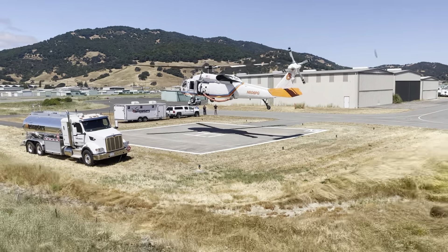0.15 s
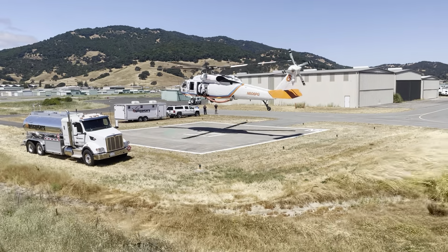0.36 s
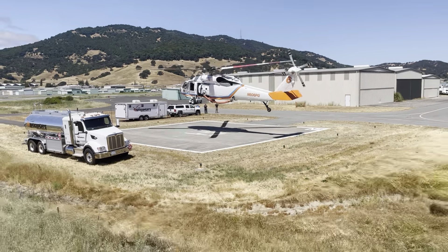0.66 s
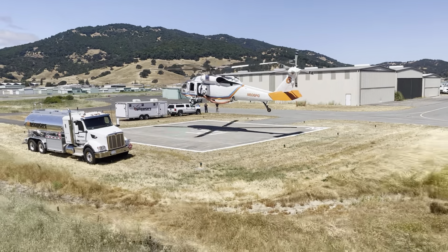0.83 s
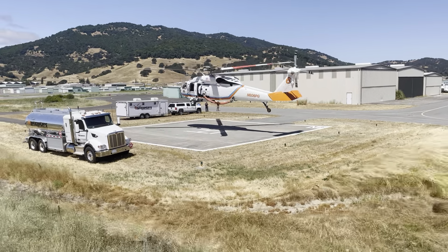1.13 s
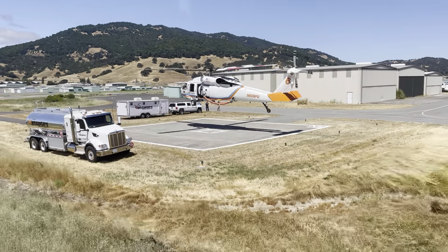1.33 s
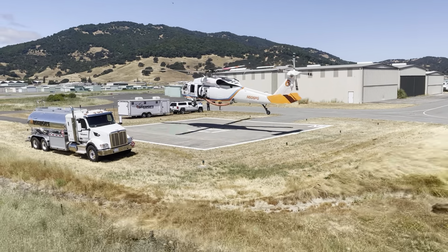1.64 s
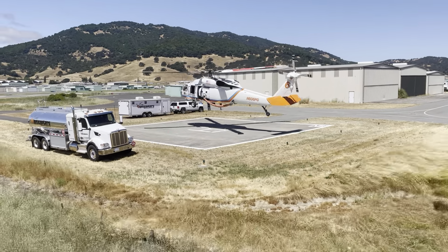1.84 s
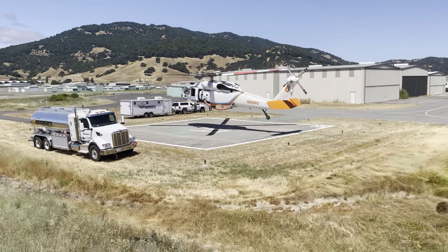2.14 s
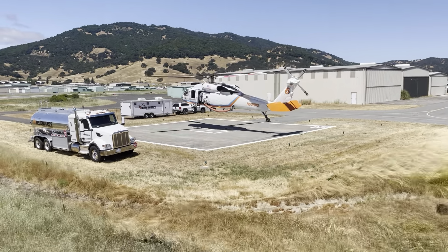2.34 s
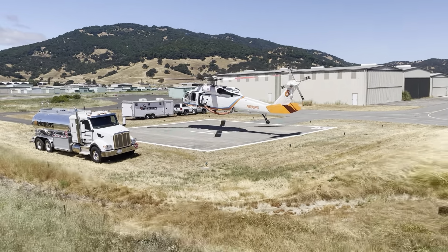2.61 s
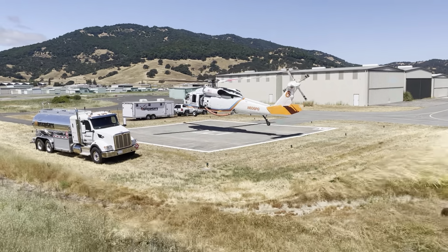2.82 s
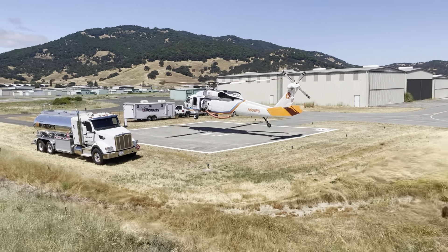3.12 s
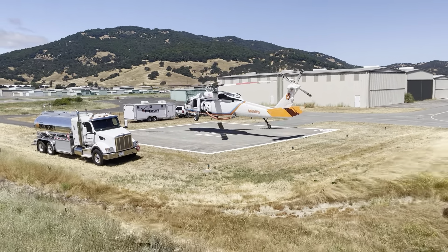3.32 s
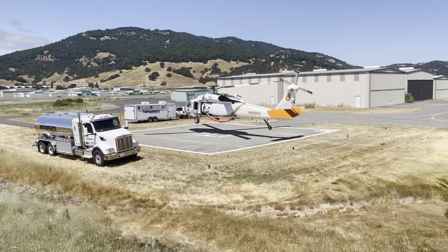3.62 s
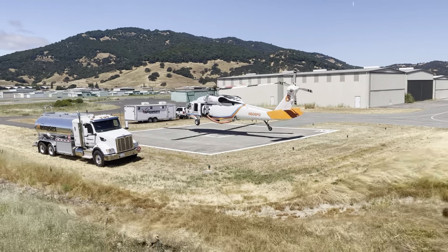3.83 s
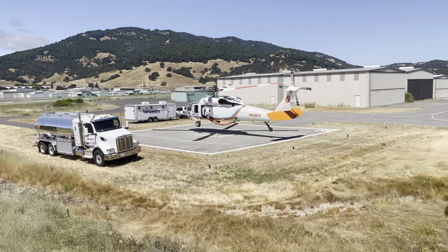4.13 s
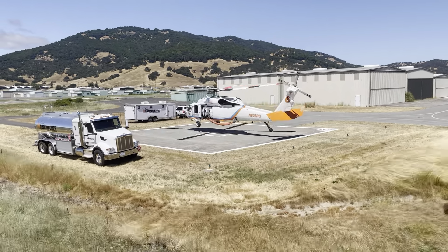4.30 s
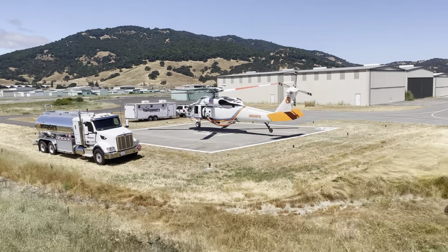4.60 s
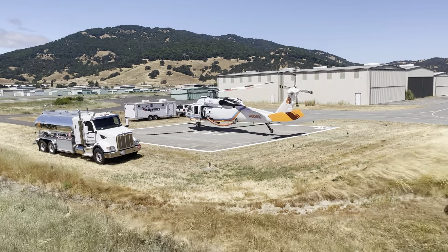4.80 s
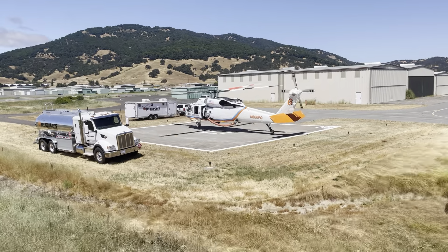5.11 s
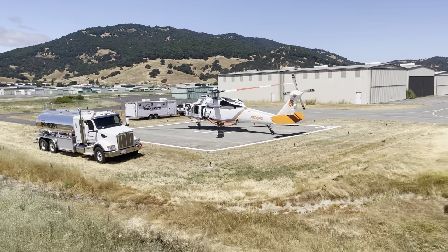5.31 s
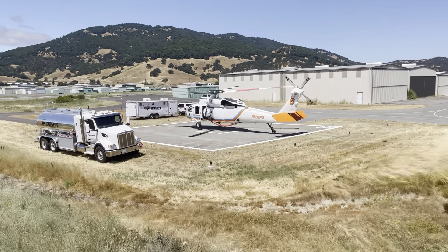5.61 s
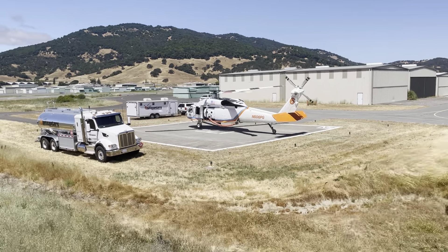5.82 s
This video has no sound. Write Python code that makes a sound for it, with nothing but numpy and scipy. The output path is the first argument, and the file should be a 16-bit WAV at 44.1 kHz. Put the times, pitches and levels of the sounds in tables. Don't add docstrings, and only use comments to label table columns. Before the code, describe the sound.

Outdoors, a big twin-turbine helicopter lowers onto a pad across a grassy field. Its roar pulses about seventeen times a second over exhaust hiss and gear whine, with downwash thumping and ripping at the stereo microphone. Before three seconds the gusts ease, main blades crack dully and the tail rotor buzzes in bursts. Gusts return near five seconds and the beating continues to the end.

```python
import sys
import numpy as np
from scipy import signal
from scipy.fft import rfft, irfft, next_fast_len
from scipy.io import wavfile
from scipy.ndimage import uniform_filter1d, map_coordinates

SR = 44100
rng = np.random.default_rng(int(sys.argv[2]) if len(sys.argv) > 2 else 0)


def put_to_file(sound):
    columns = np.atleast_2d(sound).T
    safe = np.clip(columns, -1, 1)
    whole_steps = np.round(safe * 32767)
    wavfile.write(sys.argv[1], SR, whole_steps.astype(np.int16))


def ratio_of_db(decibels):
    return 10 ** (np.asarray(decibels, float) / 20)


N = 262387


def unit(x):
    return x / np.sqrt(np.mean(x ** 2) + 1e-20)


def along(points, hz):
    f, v = np.transpose(points)
    return np.interp(np.log(hz + 1), np.log(f + 1), v)


def curves(rows):
    s, *cols = np.transpose(rows)
    return [np.interp(np.arange(N) / SR, s, c) for c in cols]


def wobble(rate_hz):
    knots = rng.standard_normal(int(N * rate_hz / SR) + 4)
    return map_coordinates(knots, [np.arange(N) * rate_hz / SR])


def filtered(x, response):
    m = next_fast_len(N + SR // 2)
    return irfft(rfft(x, m) * response(np.fft.rfftfreq(m, 1 / SR)), m)[..., :N]


def rush(spectrum, alike, patchy_db):
    z = signal.stft(rng.standard_normal((2, N)), nperseg=512)[2]
    field = uniform_filter1d(rng.standard_normal(z.shape[1:]), size=8, axis=0)
    field = uniform_filter1d(field, size=5, axis=1)
    pair = signal.istft(z * ratio_of_db(patchy_db * unit(field)), nperseg=512)[1][:, :N]

    def mid_side(hz):
        gain = ratio_of_db(np.where(hz > spectrum[-1][0], -120, along(spectrum, hz)))
        turn = np.arccos(np.clip(along(alike, hz), -1, 1)) / 2
        return gain * [np.cos(turn), np.sin(turn)]

    mid, side = filtered(pair, mid_side)
    return unit(np.array([mid + side, mid - side]))


def evened(x, span_s):
    span = int(span_s * SR)
    power = uniform_filter1d(uniform_filter1d(np.mean(x ** 2, axis=0), span), span)
    return unit(x / np.sqrt(np.abs(power) + 0.15))


def swell(passes, lag, skew):
    u = 2 * np.pi * (passes - lag)
    return np.cos(u) + skew * np.cos(2 * u)


def per_pass(passes, values):
    return uniform_filter1d(values[np.floor(passes + .5).astype(int) % len(values)], size=200)


def swells(s, length_s, rise):
    late = np.arange(0, N + 64, 64) / SR - np.asarray(s)[:, None]
    width = np.asarray(length_s)[:, None] * np.where(late < 0, rise, 1) / 2
    return np.exp(-.5 * (late / width) ** 2)


def summed(bells, heights):
    return np.interp(np.arange(N), 64 * np.arange(bells.shape[1]), heights @ bells)


# time_s, level_db, blade_loading_db (depth of each slap), low_boom_db
ROAR = [(0, -24, 1.5, -5), (.45, -23, 2.5, -17), (.85, -21, 1.5, -4), (1.05, -24, 0, 3),
        (1.25, -22.5, 3, -22), (1.52, -26, 1, 10), (1.82, -20.5, 1.5, -11), (2.9, -20.5, 1.5, -2.5),
        (3.25, -22.5, 1, 1), (3.55, -23, 7, -8), (3.92, -26.5, 3.5, 1.5), (4.36, -20.5, 6, -8),
        (4.58, -22.5, 3, 0.5), (4.8, -19.5, 3, 4.5), (5.05, -22.5, 7, 7.5), (5.3, -20, 3, -9),
        (5.45, -24, 4.5, -6.5), (5.95, -27, 4.5, 8)]
# freq_hz, level_db
BODY_COLOUR = [(50, -2.5), (150, -6), (350, -12), (700, -2.5), (1100, -0.5), (1700, -8), (2600, -10),
               (4000, -24), (7000, -41)]
BOOM_COLOUR = [(160, -30), (240, -6), (300, -1), (390, 0), (480, -7), (650, -26)]
# freq_hz, likeness
PORT_LIKENESS = [(100, 1.9), (400, 1), (1000, 0.9), (2500, 1.9), (3600, 0.5), (4400, 0.8), (5900, -0.02),
                 (7200, 0.78), (8500, 1.34), (13400, 0.5)]


def roar(passes):
    level_db, depth_db, boom_db = curves(ROAR)
    uneven = 0.29 * per_pass(passes, rng.standard_normal(128))
    slap_db = depth_db * (swell(passes, lag=-0.076, skew=-0.2) + uneven)
    crackle = ratio_of_db(3.64 * wobble(250))
    body = evened(crackle * rush(BODY_COLOUR, PORT_LIKENESS, patchy_db=2.0), span_s=0.016)
    boom = evened(rush(BOOM_COLOUR, PORT_LIKENESS, patchy_db=-0.3), span_s=0.034)
    boom = ratio_of_db(boom_db - 6.5 + 0.64 * slap_db) * boom
    direct = ratio_of_db(level_db - 4.0 + slap_db + struck()) * (body + boom)

    def ground(hz):
        echo_s = .00288
        return 1 + .62 * np.exp(-hz / 2600 - 2j * np.pi * hz * echo_s)

    return filtered(direct + cracks(), ground)


# peak_s, extra_db
SLAPS = [(0.431, -0.5), (.602, -2), (2.045, 3), (2.741, 2), (2.973, 2.5), (3.031, 1), (3.264, 1),
         (3.38, 0.5), (3.612, 0.5), (4.135, 0.5), (4.193, 0.5), (4.251, -1), (4.368, 2), (4.484, -0.5),
         (4.717, 1), (4.892, 1.5), (5.065, -0.5), (5.123, -0.5), (5.355, 3), (5.47, -0.5), (5.817, -2)]


def struck():
    s, extra_db = np.transpose(SLAPS)
    strike_s = .04
    return summed(swells(s, strike_s + 0 * s, rise=0.56), extra_db)


# start_s, peak_db, pitch_hz
CRACKS = [(1.338, -15, 706), (1.464, -11, 1120), (2.792, 0.5, 585), (2.956, 0.5, 1050), (3.013, -1, 690),
          (3.545, -3, 940), (3.555, -7, 690), (3.774, -2.5, 1110), (4.132, -3, 1350), (4.182, -5, 577),
          (4.298, -3.5, 744), (4.376, -5, 720), (4.411, -7, 1090), (4.434, -14, 714), (4.472, -18, 942),
          (4.65, -19, 732), (4.702, -1, 670), (4.878, 1.5, 706), (4.923, -3.5, 1005), (4.948, -6, 960),
          (4.992, 0, 597), (5.007, -4, 646), (5.048, -25, 988), (5.067, 0, 1190), (5.287, 0, 636),
          (5.296, 4, 500)]


def cracks():
    out, t = np.zeros(N + 512), np.arange(512) / SR
    decay60_s, attack_s = .022, .0006
    envelope = ratio_of_db(-60 * t / decay60_s) * (1 - np.exp(-t / attack_s))
    for start_s, peak_db, pitch_hz in CRACKS:
        tick = (np.sin(2 * np.pi * pitch_hz * t) + .6 * rng.standard_normal(512)) * envelope
        out[round(start_s * SR):][:512] += ratio_of_db(peak_db - 5.0) * tick
    return filtered(out[:N], lambda hz: hz ** 2 / (hz ** 2 + 300 ** 2) / (1 + (hz / 3000) ** 2))


# time_s, tip_swish_db, exhaust_hiss_db
TIPS_AND_POWER = [(0, -39, -34), (.32, -36.5, -28), (.7, -36, -33.5), (1.0, -34.5, -29.5), (1.4, -46, -31),
                  (2.1, -38, -32), (2.7, -37.5, -30), (3.0, -34, -32.5), (3.4, -38.5, -33),
                  (4.1, -39.5, -33.5), (5.0, -35.5, -38.5), (5.95, -36.5, -33)]
BLADE_TIPS = [4.5, -.5, 1, 0]
# peak_s, flare_db (over its usual level), length_s
GEAR_FLARES = [
    (.1, 8, 0.31),
    (.7, 13.5, 0.5),
    (1.09, 11, .3),
    (2.7, 20, .3),
    (3.9, 7, .2),
    (4.75, 12, 0.18),
    (5.45, 5, .2),
]
# freq_hz, level_db
TIP_COLOUR = [(3500, -22), (5500, -4.5), (7500, 1.5), (9000, -1.5), (10500, -8), (12500, -24)]
EXHAUST_COLOUR = [(1500, -0.5), (3000, -3.5), (5000, -6), (8000, -11), (11000, -17), (13000, -19.5),
                  (15700, -23)]
GEAR_COLOUR = [(2560, -30), (2588, -3), (2598, 0), (2608, -3), (2640, -30)]
COMPRESSOR_COLOUR = [(11500, -30), (12500, -13), (13050, -11), (13250, -3), (13400, 0), (13550, -4),
                     (13750, -9), (15700, -10.5)]


def tips_and_turbines(passes):
    tip_db, hiss_db = curves(TIPS_AND_POWER)
    blade_db = per_pass(passes, np.array(BLADE_TIPS)) + 2.0 * per_pass(passes, rng.standard_normal(128))
    swish_db = tip_db - 4.0 + 4.85 * swell(passes, lag=0.008, skew=0.18) + blade_db
    tips = ratio_of_db(swish_db) * rush(TIP_COLOUR, PORT_LIKENESS, patchy_db=2.5)

    loading_db = curves(ROAR)[1]
    chop_share = .5
    flutter_db = chop_share * loading_db * swell(passes, lag=-0.02, skew=.3)
    flutter_db = flutter_db + 1.17 * wobble(60) + 0.6 * wobble(22) + .6 * struck()
    hiss = ratio_of_db(hiss_db + 3.0 + flutter_db) * rush(EXHAUST_COLOUR, PORT_LIKENESS, patchy_db=1.85)

    s, flare_db, length_s = np.transpose(GEAR_FLARES)
    gear_db = -51.5 + summed(swells(s, length_s, rise=0.43), flare_db)
    gear = evened(rush(GEAR_COLOUR, PORT_LIKENESS, patchy_db=1), span_s=.06)
    gear = ratio_of_db(gear_db + 3 * swell(passes, lag=0, skew=0)) * gear
    whine = rush(COMPRESSOR_COLOUR, PORT_LIKENESS, patchy_db=1.5) * ratio_of_db(.8 * wobble(6.5))
    return tips + hiss + gear + ratio_of_db(-49.5) * whine


# peak_s, snap_db, length_s
TAIL_WAKE = [
    (0, -48, .3),
    (1.45, -44, 0.45),
    (2.84, -50, 0.23),
    (3.383, -34.5, 0.078),
    (3.883, -35, 0.042),
    (4.13, -41.5, 0.27),
    (4.79, -43, 0.13),
    (5.603, -51, 0.13),
    (5.95, -45, 0.2),
]
# freq_hz, level_db
SNAP_COLOUR = [(1500, -31), (2800, 1), (3500, 2.5), (5500, -4), (7500, -12), (10000, -24)]


def tail_rotor():
    pass_hz, start_passes = 79.6, .32
    turn = pass_hz * np.arange(N) / SR - start_passes
    gate = np.exp(3.5 * (np.cos(2 * np.pi * turn) - 1))
    blade_db = per_pass(turn, np.array([0, -11])) + 2 * per_pass(turn, rng.standard_normal(512))
    s, snap_db, length_s = np.transpose(TAIL_WAKE)
    clear_air_db = -50
    wake = ratio_of_db(clear_air_db) + summed(swells(s, length_s, rise=1), ratio_of_db(snap_db))
    snaps = unit(gate * ratio_of_db(blade_db)) * rush(SNAP_COLOUR, [(3000, 0.24)], patchy_db=-1.5)
    return ratio_of_db(3.0) * wake * snaps


# freq_hz, left_lead_rad
PORT_LEAD = [(0, 0), (300, .5), (800, -.3), (3100, -1), (4100, -.45), (5000, -.9), (6200, 2.2),
             (8000, 3.14)]
# freq_hz, left_minus_right_db
PORT_TILT = [(60, -7), (110, 2), (200, -0.67), (360, 0.56), (650, 4), (1190, 2.5), (2160, 0.5),
             (3930, -2.5), (7140, -1.6), (13000, 1)]


def ports(x):
    f, lead = np.transpose(PORT_LEAD)
    lead_rad_per_khz = .97

    def half(hz):
        turn = np.interp(hz, f, lead) + lead_rad_per_khz * np.maximum(hz - f[-1], 0) / 1000
        return ratio_of_db(along(PORT_TILT, hz) / 2) * np.exp(.5j * turn)

    return filtered(x, lambda hz: np.array([half(hz), 1 / half(hz)]))


# time_s, buffet_db
STEADY_WASH = [(0, -23.5), (.5, -25.5), (.9, -27.5), (1.2, -20.5), (2.2, -26.5), (3.0, -29), (3.9, -28),
               (4.6, -32.5), (5.1, -33.5), (5.3, -27.5), (5.95, -31.5)]
# peak_s, peak_db, length_s, tear_db (above the buffet's colour)
GUSTS = [(0.026, -19, 0.014, 0), (0.189, -17, 0.042, -10), (0.29, -19.5, 0.074, -17),
         (0.722, -19, 0.18, -2.5), (1.046, -15.5, 0.072, 5.5), (1.322, -21.5, 0.068, -1),
         (1.443, -23.5, 0.033, 5), (1.557, -16.5, 0.021, 11.5), (1.585, -23, 0.057, -3),
         (1.68, -18.5, 0.17, -18), (1.903, -15, 0.031, -10), (1.988, -19, 0.045, 4), (2.083, -19, 0.054, 0),
         (2.18, -19, .05, -18), (2.338, -24.5, 0.15, 5), (2.43, -24.5, 0.1, -9), (2.544, -18, 0.035, -3),
         (2.637, -21.5, .03, -17), (2.73, -21, 0.056, -7), (3.235, -31, 0.055, 2), (3.41, -28, 0.045, -2),
         (3.541, -23.5, 0.043, 0), (3.64, -24, 0.05, -7), (3.78, -25, 0.073, -2), (4.045, -18, 0.076, 2),
         (5.193, -25.5, .05, 10), (5.274, -20, 0.088, 11), (5.463, -22, 0.022, -12),
         (5.37, -26.5, 0.066, 0), (5.88, -27, 0.025, -6)]
# freq_hz, level_db
BUFFET_COLOUR = [(20, -50), (40, -2.5), (65, 6), (130, 1), (250, -7), (500, -21.5), (1200, -22),
                 (3000, -50)]
TEAR_COLOUR = [(100, -10.5), (250, -5.5), (500, -4), (1000, -11), (2000, -12.5), (5000, -36)]


def downwash():
    s, peak_db, length_s, tear_db = np.transpose(GUSTS)
    bells = swells(s, length_s, rise=1)
    steady = ratio_of_db(curves(STEADY_WASH)[0])

    def lumps(rate_hz):
        each_port = np.array([wobble(rate_hz), wobble(rate_hz)])
        return ratio_of_db(1.26 * wobble(rate_hz) + 5.9 * each_port)

    buffet = rush(BUFFET_COLOUR, [(60, 0.9), (300, 0.5), (800, 0.093)], patchy_db=-0.5)
    buffet = evened(lumps(36) * buffet, span_s=0.028)
    tear = rush(TEAR_COLOUR, [(250, 0.51), (600, 0.017)], patchy_db=3.5)
    tear = evened(lumps(74) ** 0.73 * tear, span_s=0.069)
    push = np.hypot(steady, summed(bells, ratio_of_db(peak_db)))
    gust_top_hz, steady_tear_db = 750, 3
    rip = summed(bells, ratio_of_db(peak_db + tear_db)) * tear
    rip = filtered(rip, lambda hz: 1 / (1 + (hz / gust_top_hz) ** 3))
    torn = steady * ratio_of_db(steady_tear_db) * tear + ratio_of_db(1.0) * rip
    return ratio_of_db(3.0) * (push * buffet + ratio_of_db(-6.0) * torn)


# start_s, peak_db, pitch_hz, left_minus_right_db
THUMPS = [(0.031, -0.5, 127, 3), (0.198, -20, 160, -3), (0.3, 5, 116, 0.0), (0.993, 0.5, 174, -1.0),
          (1.043, -9, 127, -3), (1.065, -3, 72.7, 8), (1.2, -1, 72.7, -0.5), (1.348, -2, 155, 0),
          (1.548, 3, 247, 0), (1.557, 2, 330, 2), (1.558, -4, 79, -2), (1.891, -22, 102, -2),
          (1.999, -10, 148, -4), (4.023, -1.5, 88, -3), (4.059, -5, 76, 6), (5.176, 3.5, 260, 4),
          (5.262, -4, 129, 4), (5.291, -4, 106, -4), (5.454, -3, 124, -3)]


def thumps():
    out, t = np.zeros((2, N + 2048)), np.arange(2048) / SR
    for start_s, peak_db, pitch_hz, pan_db in THUMPS:
        cycles = pitch_hz * t
        envelope = 1.8 * cycles * np.exp(-.75 * cycles) * (cycles < 8)
        push = np.sin(2 * np.pi * cycles * (1 - 0.074 * cycles)) * envelope
        port_db = peak_db - 11.5 + pan_db * np.array([[.5], [-.5]])
        out[:, round(start_s * SR):][:, :2048] += ratio_of_db(port_db) * push
    return out[:, :N]


# time_s, blade_passes (counted so far)
PASSES = [(0.0, 0.49), (0.7, 12.63), (1.4, 24.76), (2.1, 36.88), (2.8, 48.95), (3.5, 61.0), (4.2, 73.05),
          (4.9, 85.08), (5.6, 97.18), (5.95, 103.24)]


def scene():
    passes = curves(PASSES)[0]
    far = roar(passes) + tips_and_turbines(passes) + tail_rotor()
    return ports(far) + downwash() + thumps()


def starved(x, bands_hz):
    hz, t, z = signal.stft(x, SR, nperseg=2048)
    hz = hz[:, None]
    for lo_hz, hi_hz in bands_hz:
        draws = rng.standard_normal((2, len(t) // 2 + 1)).repeat(2, axis=1)[:, :len(t)]
        step_hz = 170 * np.round(draws * .8)
        z = z * ((hz < lo_hz + .2 * step_hz[0]) | (hz > hi_hz + step_hz[1]))
    return signal.istft(z, SR, nperseg=2048)[1][:N]


def top_cut(x):
    return signal.sosfilt(signal.butter(12, 15750, fs=SR, output="sos"), x)


def record(dry):
    x = filtered(dry, lambda hz: (hz / 40) ** 2 / (1 + (hz / 40) ** 2))
    x = x / (1 + np.abs(x / .92) ** 4) ** (1 / 4)
    mid = starved((x[0] + x[1]) / 2, [(7650, 8500), (13750, 20000)])
    side = starved((x[0] - x[1]) / 2, [(10380, 12400)])
    return top_cut(np.array([mid + side, mid - side]))


dry = scene()
out = record(dry)
put_to_file(out)
```